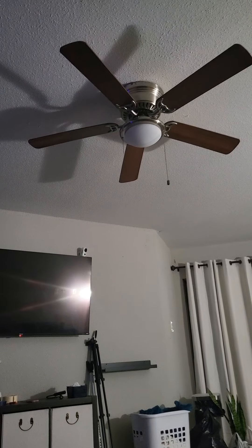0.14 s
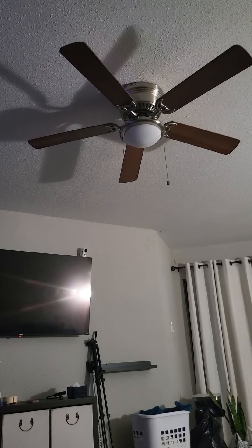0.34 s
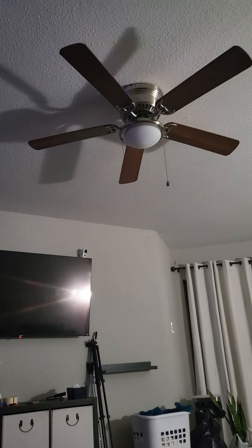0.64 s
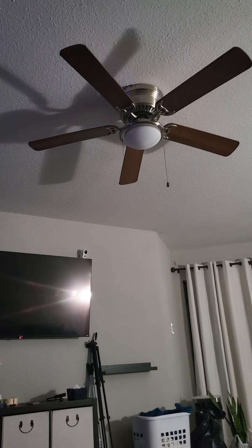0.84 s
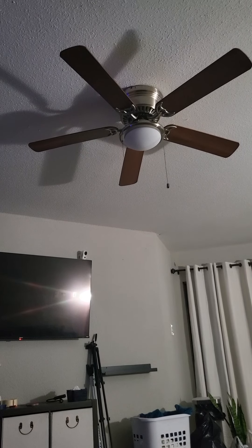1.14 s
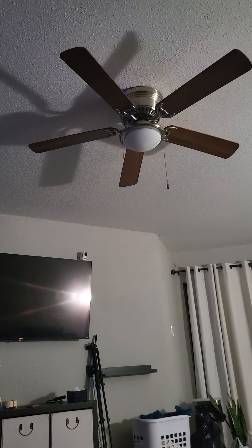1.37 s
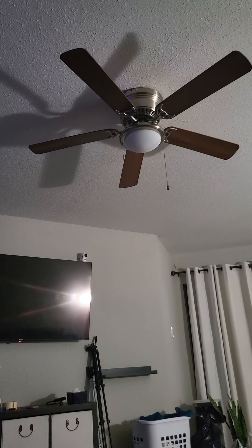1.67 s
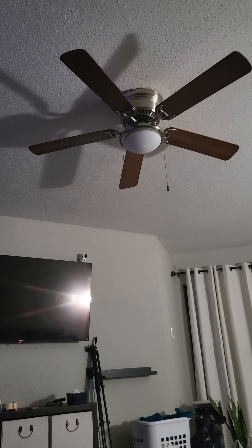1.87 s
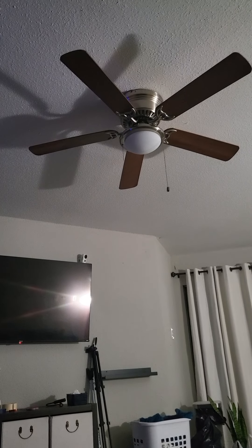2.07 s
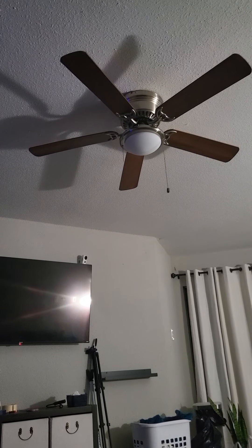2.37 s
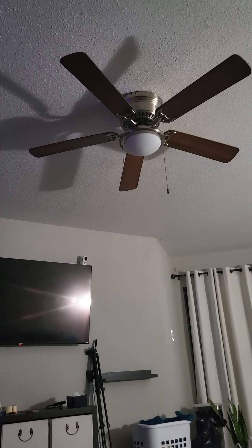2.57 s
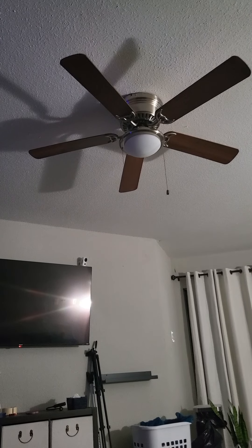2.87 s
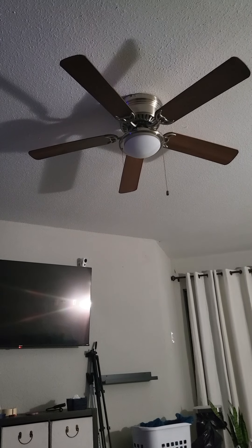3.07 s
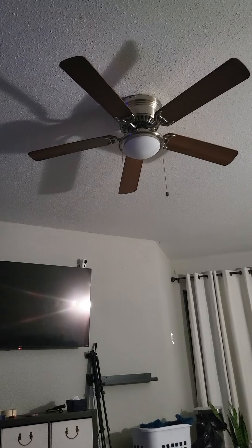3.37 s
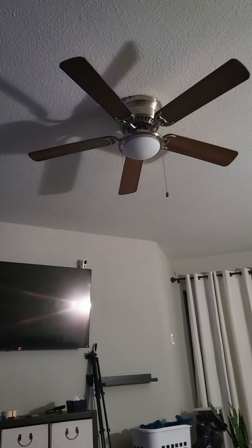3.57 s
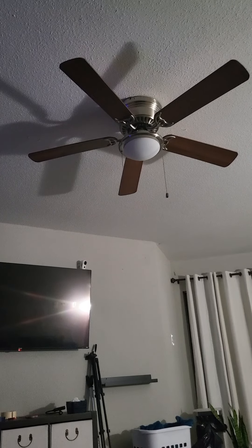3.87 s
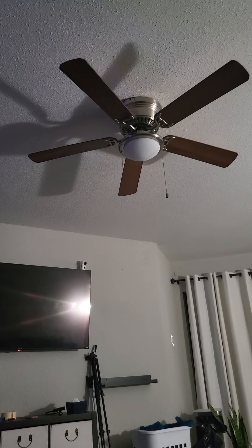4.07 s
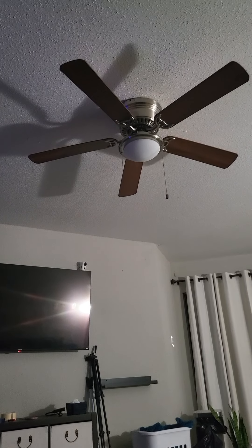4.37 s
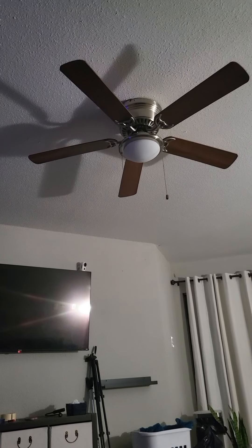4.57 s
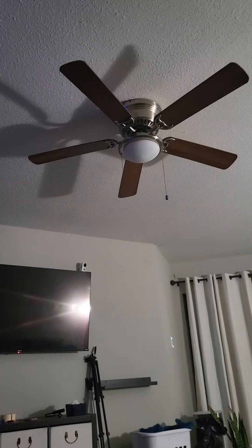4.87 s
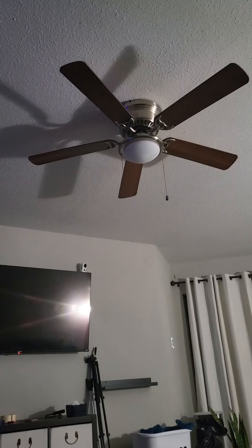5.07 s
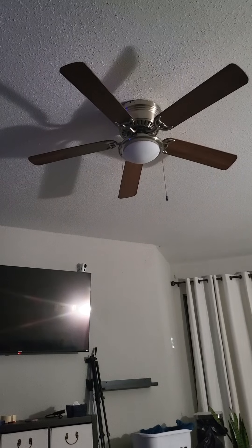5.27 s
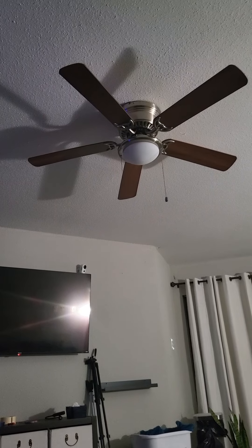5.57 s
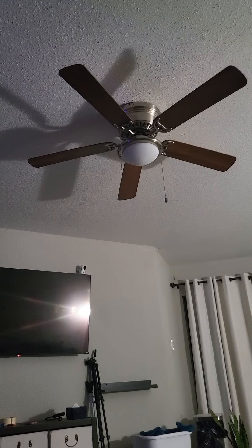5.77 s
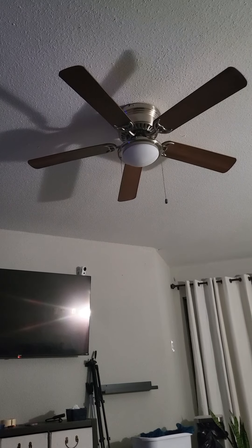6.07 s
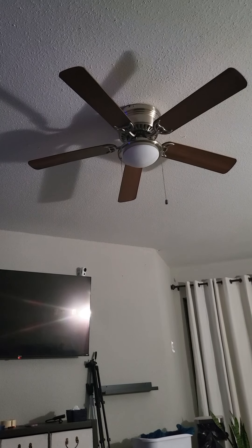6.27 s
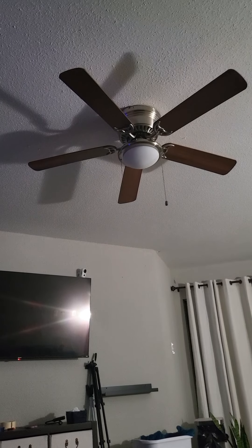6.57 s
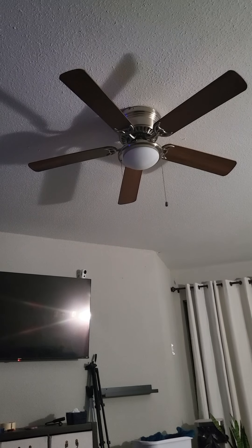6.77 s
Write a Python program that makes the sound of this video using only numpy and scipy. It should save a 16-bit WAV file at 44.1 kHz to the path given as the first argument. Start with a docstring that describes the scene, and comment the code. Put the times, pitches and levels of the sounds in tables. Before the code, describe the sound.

Low booming steps from upstairs heard through a bedroom ceiling, after faint scuffs, with muffled knocks, dry joint ticks and a soft low rumble.

```python
"""Quiet room under a timber floor: someone stomps across overhead, about two steps a second.
Heel and sole swing the joists (decaying sines) and knock the boards (filtered noise bursts).
The ceiling joints creak and crack (stick-slip noise, snaps); soft scuffs come mostly before the stomping.
Noise reverberation follows the knocks, creaks and scuffs; a low rumble and a faint hum lie beneath."""
import sys
import numpy as np
from scipy import signal
from scipy.fft import rfft, irfft, next_fast_len
from scipy.io import wavfile
from scipy.ndimage import uniform_filter1d, map_coordinates

SR = 44100
rng = np.random.default_rng(int(sys.argv[2]) if len(sys.argv) > 2 else 0)


def persist_wave(psi):
    """Save psi, clipped to +-1, as 16-bit WAV."""
    counts = np.round(np.clip(psi, -1, 1) * 32767).astype(np.int16)
    wavfile.write(sys.argv[1], SR, np.atleast_2d(counts).T)


N = 305039

# footfalls: (heel landing [s], boom level [dB], pitch [Hz], swell [s], knock level [dB],
#   knock muffled above [Hz], sole delay [s], sole boom re heel [dB], sole knock re heel [dB])
FOOTFALLS = [(0.143, -38, 54.2, 0.021, -62.5, 396, 0.075, -7, 0),
             (.409, -34, 52.3, 0.019, -60, 500, 0.082, -5.5, -3.5),
             (.904, -27, 57.7, .029, -45, 400, 0.096, -5.5, -14),
             (1.411, -22, 59.4, 0.028, -46.5, 710, 0.099, -9, -13.5),
             (1.884, -27, 49.8, 0.028, -43.5, 556, 0.051, -13, -6.5),
             (2.346, -27, 50.2, 0.027, -40.5, 612, .078, -4.5, -7),
             (2.814, -19.5, 61, 0.028, -44.5, 950, .11, -22, -22),
             (3.3, -23.5, 67.3, 0.027, -44, 855, 0.052, -0.5, -4.5),
             (3.754, -29.5, 55.3, 0.032, -46, 1310, 0.075, -8, -4.5),
             (4.242, -25, 45.8, 0.025, -56, 655, 0.076, -8, 11),
             (4.722, -21, 46.6, 0.034, -45.5, 814, .073, -7, -9.5),
             (5.22, -22.5, 48.3, 0.023, -55, 550, 0.063, -13.5, 10),
             (5.702, -24.5, 53, .036, -52, 800, 0.063, -5.5, -10.5)]
# light bumps on the boards: (time [s], level [dB], contact [s], muffled above [Hz])
BOARD_BUMPS = [(.061, -52, 0.038, 1500), (.355, -45, 0.032, 1220), (.581, -48, 0.022, 440),
               (.8, -51.5, 0.015, 500), (3.25, -40.5, 0.012, 407), (4.532, -47, 0.018, 436),
               (6.28, -53, 0.027, 900)]
# ceiling joint cracks: (time [s], level [dB], centre [Hz],
#   opening snap before SNAP_TRIM_DB [dB], following slip re crack [dB])
JOINT_CRACKS = [(.917, -65.5, 3000, 0.5, -18), (.99, -72, 2600, -16, -1.5), (1.501, -70, 2800, -18.5, -4),
                (1.866, -61.5, 5400, -2.5, 3.5), (1.941, -58, 2850, -1.5, -8.5),
                (2.288, -72, 3100, -4.5, -8), (2.345, -56.5, 4900, -4.5, -2), (2.422, -63, 3350, 1.5, -8),
                (2.529, -70.5, 4500, 3, -24.5), (2.811, -63.5, 4000, 2, -22),
                (2.84, -58.5, 3750, -9, -15.5), (3.314, -49.5, 3200, -2.5, -9.5),
                (3.769, -48, 2970, -1.5, -13), (4.312, -71.5, 3110, -2.5, -1.5), (5.228, -73, 3760, -8, -7),
                (5.296, -49.5, 2770, 3, -5.5)]
# scuffs and squeaks: (time [s], level [dB], swell [s], resonance [Hz], its width [Hz], its height [dB])
SCUFF_EVENTS = [(.006, -57.5, 0.0048, 3840, 180, 23), (.035, -66, .018, 2220, 219, 26.5),
                (.062, -61, 0.0073, 2280, 395, 3), (.313, -60.5, .02, 800, 110, 13.5),
                (.355, -52, .01, 387, 130, 17), (.445, -62, 0.014, 3780, 900, 13),
                (0.465, -63, 0.0061, 5630, 550, 17.5), (.63, -71, 0.045, 3480, 553, 11),
                (3.248, -71, 0.013, 3550, 1220, -15), (6.305, -71, 0.014, 1000, 1600, 23)]
# floorboard modes: (frequency [Hz], width [Hz], level [dB])
BOARD_MODES = [(87.6, 20, 3.5), (134.3, 20, 4), (159.3, 9.9, 5.5), (202.7, 7.8, 3.5), (217.3, 14, 0.5),
               (275.3, 38, -5.5), (328, 16, -9.5), (353.6, 19, -14.5), (428, 18, -16), (600, 240, -24)]
# relative spectra of joist ring, board noise, joint slip, joint snap, rubbing sole and room air:
#   (frequency [Hz], level [dB])
JOIST_SPECTRUM = [(12, -21), (28, -3), (38, 2), (60, -3.5), (72, -5), (90, -10.5), (150, -24), (400, -88)]
BOARD_SPECTRUM = [(50, -37.5), (110, -7.5), (250, -14.5), (450, -26.5), (800, -29.5), (1400, -26.5),
                  (2500, -63), (6000, -84)]
JOINT_SPECTRUM = [(100, -19.5), (400, 13), (900, 3), (1550, -1), (2100, 1), (3100, -4), (4400, -7.5),
                  (5100, -14), (6500, -15.5), (7800, -18.5), (10000, -25.5), (15000, -29)]
SNAP_SPECTRUM = [(300, -22.5), (1500, -9.5), (3000, -6), (4500, 7.5), (6000, -9), (7800, -6), (10000, -16),
                 (15000, -22.5)]
SOLE_SPECTRUM = [(100, -7.5), (400, 6), (850, 5.5), (1200, -2), (2300, 0.5), (4000, -8.5), (4800, -13.5),
                 (5700, -22), (6400, -22.5), (9000, -37), (15000, -29)]
AIR_SPECTRUM = [(12, -20.5), (24, -7), (40, 1.5), (60, -1), (110, -15.5), (260, -20), (450, -29.5),
                (750, -38), (1300, -41.5), (1600, -47.5), (2500, -53.5), (4200, -60), (5000, -63.5),
                (6500, -68), (9500, -65.5), (15000, -68.5)]
# background as the house settles down: (time [s], level re AIR_DB [dB])
HOUSE_BUSTLE = [(0, 3), (1.6, 1.5), (3, 1), (5, 0), (6.9, 0)]
# hum partials: (frequency [Hz], level [dB])
HUM_PARTIALS = [(161.5, -72.5), (199.2, -68.5), (319, -71.5)]
# reverberation time: (frequency [Hz], t60 [s])
ROOM_T60 = [(100, 0.56), (500, 0.53), (1400, 0.5), (3000, 0.57), (7000, 0.46), (12000, 0.27)]
# left-right likeness of diffuse sound: (frequency [Hz], correlation [-])
STEREO_LIKENESS = [(60, 0.99), (150, 0.97), (350, 0.78), (700, 0.21), (1400, 0.01), (5000, 0)]
# microphone port response: (frequency [Hz], gain [dB])
MIC_RESPONSE = [(6700, 1), (7200, 8), (7550, 12.5), (7850, 1.5), (8200, -8.5), (9000, -8.5), (10500, -3.5),
                (11500, 2)]

LENGTH = SR * 3 // 5  # samples in one sound
T = np.arange(LENGTH) / SR  # s since an event
RIGHT_LAG = 14  # samples by which direct sound reaches the right port later
TOP_HZ = 15550

SOLE_SWELL_S, SOLE_PITCH_RATIO = 0.031, 1.03  # pitch re heel
# joists swing back as the weight lifts; level re heel
REBOUND_S, REBOUND_DB, REBOUND_HZ, REBOUND_SWELL_S = 0.155, -14.5, 45.2, 0.03
OVERTONE_RATIO, OVERTONE_DB, HARDEN = 1.855, -3.0, 0.63  # HARDEN: overtone dB per dB of knock re boom
RUMBLE_DB, RUMBLE_T60_S, RUMBLE_RISE_S = -15.02, 0.94, 0.023  # level re boom, before decay
SHUFFLE_END_S, SHUFFLE_FADE_S, SHUFFLE_DB = 0.865, 0.12, -47.5
KNOCK_LAG_S, CONTACT_S = 0.005, 0.017  # boards sound just after the heel lands
CREAK_DB, CREAK_HZ, CREAK_S, CREAK_RING_DB = -51.5, 2700, 0.02, 5  # level re the step's boom
STRAIN_S, STRAIN_DB, STRAIN_HZ, STRAIN_RING_DB = 0.009, -10, 4200, 8  # lead and level re the crack
CRACK_S, CRACK_RING_DB = 0.0032, 9
SNAP_S, SNAP_TRIM_DB = 0.0012, -2.0
SLIP_AFTER_S, SLIP_S, SLIP_HZ, SLIP_RING_DB = 0.018, 0.0072, 2190, 9.5
AIR_DB, HUM_WAVER = -50.5, 0.22  # waver of phase [rad] and relative amplitude


def loads():
    """Heel, sole and rebound: (time [s], level [dB], pitch [Hz], swell [s], overtone re boom [dB])."""
    for s, db, hz, rise_s, knock_db, _, sole_s, sole_db, _ in FOOTFALLS:
        # a hard landing (loud knock re boom) wakes the second mode
        overtone_db = OVERTONE_DB + HARDEN * (knock_db - db)
        yield s, db, hz, rise_s, overtone_db
        yield s + sole_s, db + sole_db, hz * SOLE_PITCH_RATIO, SOLE_SWELL_S, overtone_db
        yield s + REBOUND_S, db + REBOUND_DB, REBOUND_HZ, REBOUND_SWELL_S, overtone_db


def thuds():
    """Each load swings two joist modes for a few cycles; the building rumbles on."""
    out = np.zeros((2, N))
    for s, db, hz, rise_s, overtone_db in loads():
        first_mode = np.sin(2 * np.pi * hz * T)
        second_mode = amp(overtone_db) * np.sin(2 * np.pi * (OVERTONE_RATIO * hz * T + rng.random()))
        boom = amp(db) * swell(rise_s, sharp=2) * (second_mode - first_mode)
        boom *= 1 / (1 + (T / (2.02 * rise_s)) ** 6)  # the foot damps the swing
        rumble = joist_noise(LENGTH) * amp(db + RUMBLE_DB - 60 * T / RUMBLE_T60_S)
        rumble *= 1 - np.exp(-(T / RUMBLE_RISE_S) ** 2)
        add(out, s, boom + rumble)
    return out


def shuffle():
    """Shifting weight keeps the joists rumbling until the stomping starts."""
    fade = np.clip((SHUFFLE_END_S - np.arange(N) / SR) / SHUFFLE_FADE_S, 0, 1)
    return amp(SHUFFLE_DB) * fade * joist_noise(N)


def joist_noise(count):
    """Noise with the joists' spectrum, rms 1."""
    return unit(filtered(rng.standard_normal(count), lambda f: amp(along(JOIST_SPECTRUM, f))))


def blows():
    """Heel, sole and bumps on the boards: (time [s], level [dB], contact [s], muffled above [Hz])."""
    for s, _, _, _, db, soft_hz, sole_s, _, sole_db in FOOTFALLS:
        yield s + KNOCK_LAG_S, db, CONTACT_S, soft_hz
        yield s + sole_s, db + sole_db, CONTACT_S, soft_hz
    yield from BOARD_BUMPS


def board_gain(f):
    """Board response: broad noise floor plus modal peaks."""
    modes = sum(amp(db) * resonance(f, hz, width_hz) for hz, width_hz, db in BOARD_MODES)
    return amp(along(BOARD_SPECTRUM, f)) + modes


def knocks():
    """Short uneven blows ring the boards; each is muffled above the frequency given for it."""
    out = np.zeros((2, N))
    for s, db, contact_s, muffle_hz in blows():
        force = stick_slip(spiky=0.67) * swell(contact_s, sharp=1.5)
        colour = lambda f: 20 * np.log10(board_gain(f) / (1 + (f / muffle_hz) ** 3))
        heard = coloured(in_room(force, direct_db=2.5), colour)
        add(out, s, at_level(heard, db))
    return balanced(out, left_db=-1.4)


def cracks():
    """Steps creak faintly; at times a joint strains, lets go with a snap and slips on, duller."""
    out = np.zeros((2, N))
    for s, db, *_ in FOOTFALLS:
        add(out, s, at_level(creak(CREAK_S, CREAK_HZ, CREAK_RING_DB), db + CREAK_DB))
    for s, db, hz, snap_db, slip_db in JOINT_CRACKS:
        strain = creak(CRACK_S, STRAIN_HZ, STRAIN_RING_DB)
        release = creak(CRACK_S, hz, CRACK_RING_DB) + amp(snap_db + SNAP_TRIM_DB) * snap(SNAP_S)
        slip = creak(SLIP_S, SLIP_HZ, SLIP_RING_DB)
        add(out, s - STRAIN_S, at_level(strain, db + STRAIN_DB))
        add(out, s, at_level(release, db))
        add(out, s + SLIP_AFTER_S, at_level(slip, db + slip_db))
    return balanced(out, left_db=3)


def creak(length_s, hz, ring_db):
    """A joint slips, most at half of length_s, and rings around one pitch."""
    slips = unit(stick_slip(spiky=0.46) * swell(length_s / 2, sharp=0.9))
    ring = lambda f: ring_db / (1 + (np.log2((f + 1) / hz) / 0.3) ** 2)
    return coloured(in_room(slips, direct_db=-7.5), lambda f: along(JOINT_SPECTRUM, f) + ring(f))


def snap(rise_s):
    """A joint lets go: bright, dry noise tick."""
    burst = unit(rng.standard_normal(LENGTH) * swell(rise_s, sharp=0.8))
    return coloured(direct_pair(burst), lambda f: along(SNAP_SPECTRUM, f))


def scuffs():
    """Rubbing swells gently; where it catches on one resonance it squeaks."""
    out = np.zeros((2, N))
    for s, db, rise_s, hz, width_hz, ring_db in SCUFF_EVENTS:
        rub = stick_slip(spiky=0.39) * swell(rise_s, sharp=0.87)
        squeak = lambda f: 20 * np.log10(1 + amp(ring_db) * resonance(f, hz, width_hz))
        heard = coloured(in_room(rub, direct_db=-3.5), lambda f: along(SOLE_SPECTRUM, f) + squeak(f))
        add(out, s, at_level(heard, db))
    return balanced(out, left_db=4.5)


def room_tone():
    """Low building rumble (diffuse noise) and an appliance's slightly unsteady hum (wavering sines)."""
    t = np.arange(N) / SR
    air = unit(filtered(diffuse(N), lambda f: amp(along(AIR_SPECTRUM, f))))
    out = air * amp(AIR_DB + np.interp(t, *np.transpose(HOUSE_BUSTLE)))
    drift = lambda: map_coordinates(rng.standard_normal(60), [t * 5])  # 5 random points per s
    for hz, db in HUM_PARTIALS:
        tone = np.sin(2 * np.pi * hz * t + HUM_WAVER * drift())
        out += amp(db) * unit(tone * (1 + HUM_WAVER * drift()))
    return out


def in_room(force, direct_db):
    """Direct sound plus the room's answer."""
    reverb = signal.fftconvolve(force[None], room_tail(), axes=1)[:, :LENGTH]
    return amp(direct_db) * direct_pair(force) + reverb


def direct_pair(x):
    """Direct sound reaches the left microphone port first."""
    return np.array([x, np.roll(x, RIGHT_LAG)])


def room_tail():
    """Fresh stereo reverberation: noise decaying per frequency, left energy 1."""
    hz, t, z = signal.stft(diffuse(LENGTH), SR, nperseg=256)
    decay = amp(-60 * t / along(ROOM_T60, hz)[:, None])
    tail = signal.istft(z * decay, SR, nperseg=256)[1][:, :LENGTH]
    tail *= 1 - np.exp(-T / 0.00062)
    return tail / np.linalg.norm(tail[0])


def diffuse(count):
    """Stereo white noise, alike in the bass and unrelated in the treble."""
    turn = lambda hz: np.arccos(np.clip(along(STEREO_LIKENESS, hz), -1, 0.998)) / 2
    mid_side_gain = lambda hz: np.array([np.cos(turn(hz)), np.sin(turn(hz))])
    mid, side = filtered(rng.standard_normal((2, count)), mid_side_gain)
    return np.array([mid + side, mid - side])


def stick_slip(spiky):
    """Dense tiny clicks: noise whose size jumps every 30 samples."""
    size = np.repeat(rng.standard_normal(LENGTH // 30), 30)
    return rng.standard_normal(LENGTH) * np.exp(spiky * size)


def swell(rise_s, sharp):
    """Envelope that peaks at 1 after rise_s."""
    u = T / max(rise_s, 0.0005)
    return (u * np.exp(1 - u)) ** sharp


def resonance(f, hz, width_hz):
    """Bell-shaped peak of one mode."""
    return 1 / (1 + ((f - hz) * 2 / width_hz) ** 2)


def amp(db):
    """Decibels to gain."""
    return 10 ** (np.asarray(db) / 20)


def unit(x):
    """Scale to rms 1."""
    return x / np.sqrt(np.mean(x ** 2) + 1e-30)


def at_level(x, db):
    """Scale so that the loudest 30 ms have this rms level."""
    power = uniform_filter1d(np.mean(x ** 2, 0), size=1323)
    return x * amp(db) / np.sqrt(power.max())


def balanced(x, left_db):
    """Make left louder than right by left_db."""
    return x * amp([[left_db / 2], [-left_db / 2]])


def add(track, s, sound):
    """Mix a sound in at time s."""
    start = max(round(s * SR), 0)
    part = track[..., start:start + sound.shape[-1]]
    part += sound[..., :part.shape[-1]]


def along(points, hz):
    """(frequency [Hz], value) points read on a log axis."""
    f, v = np.transpose(points)
    return np.interp(np.log(hz + 1), np.log(f + 1), v)


def filtered(x, response):
    """Zero-phase filter with gain response(Hz)."""
    n = x.shape[-1]
    m = next_fast_len(n + n // 10)
    return irfft(rfft(x, m) * response(np.fft.rfftfreq(m, 1 / SR)), m)[..., :n]


def coloured(x, level_db):
    """Causal minimum-phase filter with gain level_db(Hz), by folding the cepstrum."""
    size = 8192
    cepstrum = irfft(np.log(amp(level_db(np.fft.rfftfreq(size, 1 / SR))) + 1e-6))
    cepstrum[1:size // 2] *= 2
    cepstrum[size // 2 + 1:] = 0
    kernel = irfft(np.exp(rfft(cepstrum)))
    return signal.fftconvolve(x, kernel[None], axes=1)[:, :x.shape[1]]


def scene():
    """Footfalls, the ceiling's answer and the quiet room."""
    joists = balanced(thuds() + shuffle(), left_db=0.8)
    return joists + knocks() + cracks() + scuffs() + room_tone()


def record(dry):
    """The microphone port has a treble peak and notch; nothing passes above TOP_HZ."""
    ported = coloured(dry, lambda f: along(MIC_RESPONSE, f))
    return filtered(ported, lambda f: f < TOP_HZ)


dry = scene()
out = record(dry)
persist_wave(out)
```